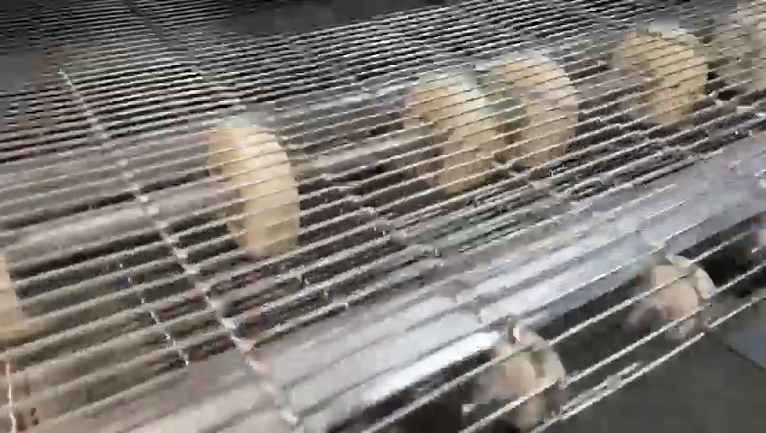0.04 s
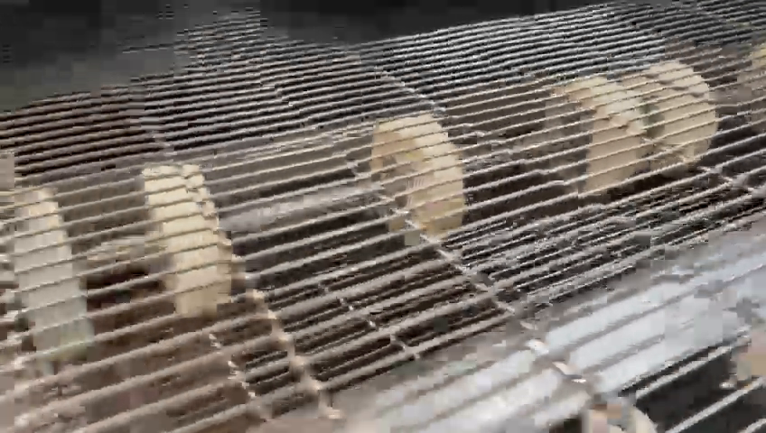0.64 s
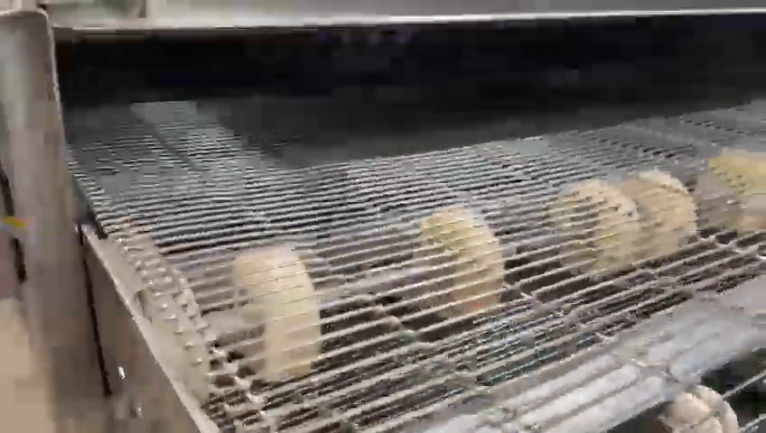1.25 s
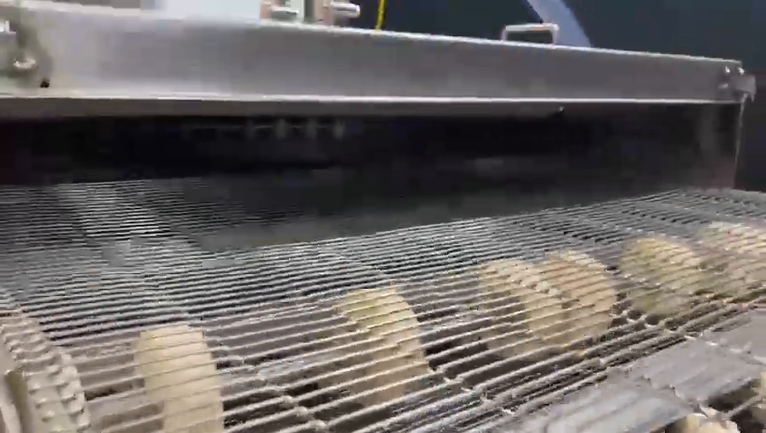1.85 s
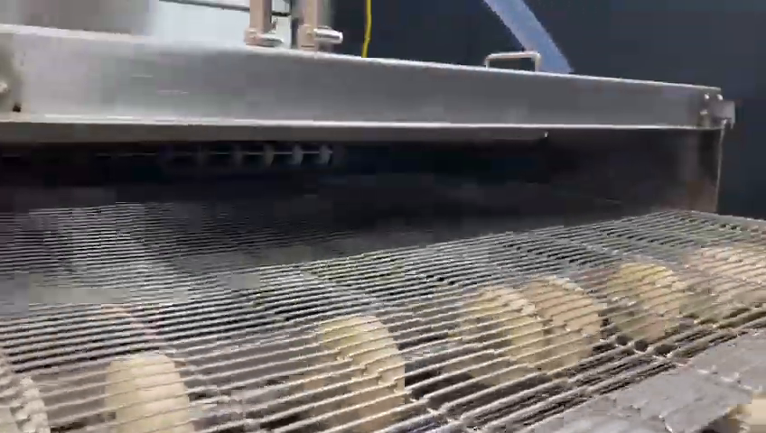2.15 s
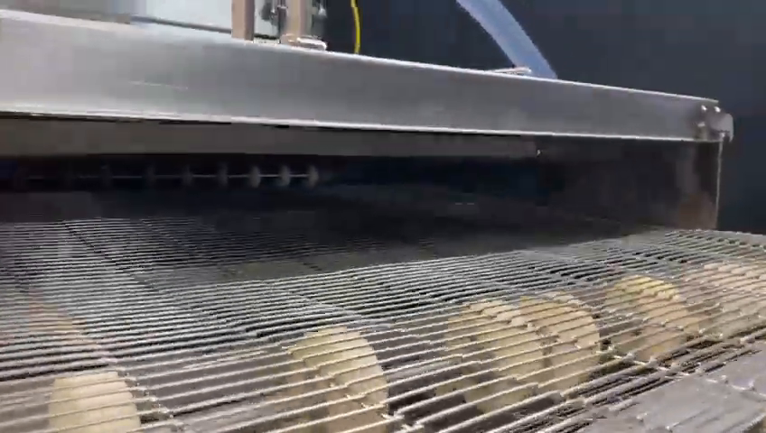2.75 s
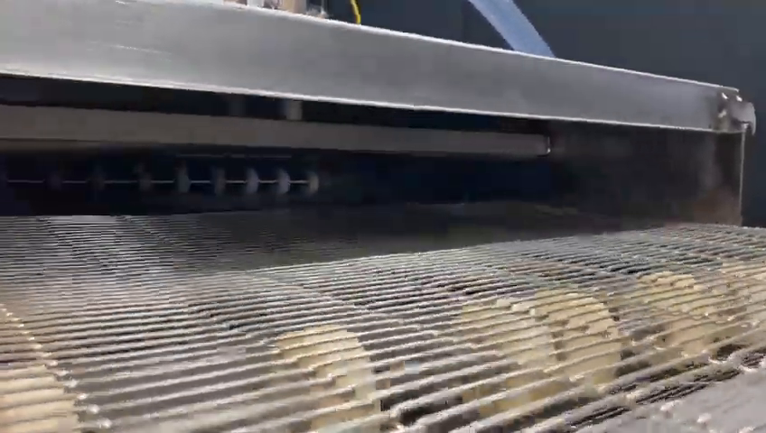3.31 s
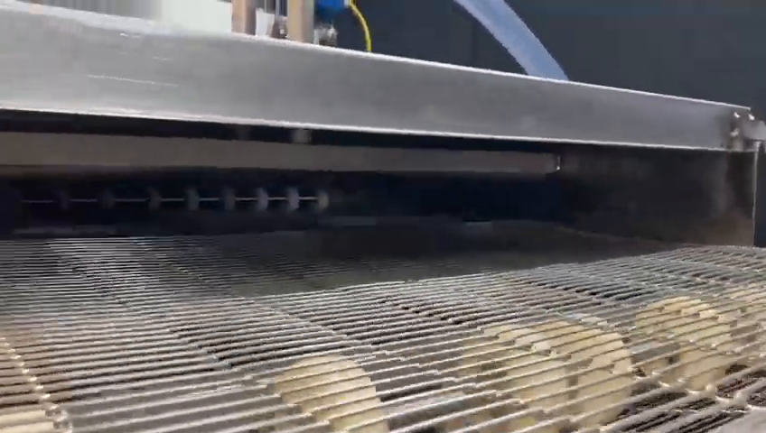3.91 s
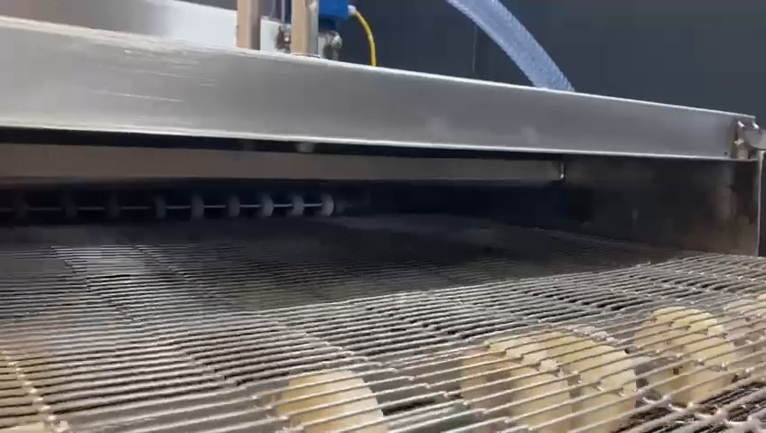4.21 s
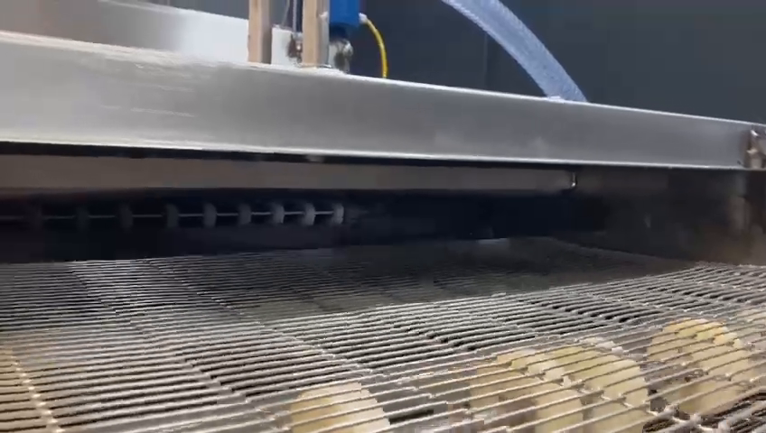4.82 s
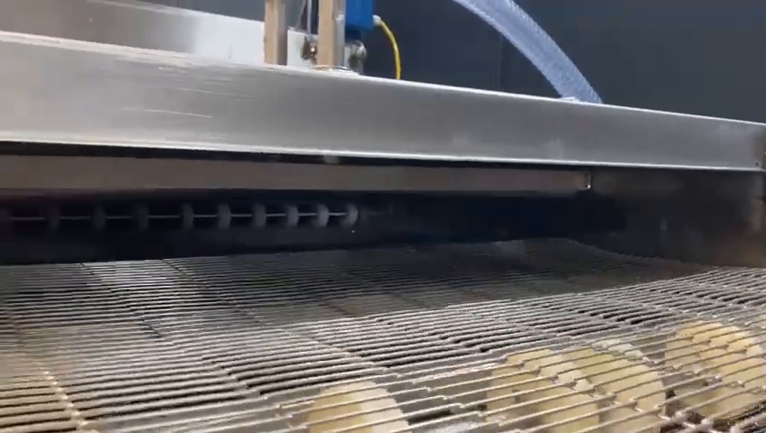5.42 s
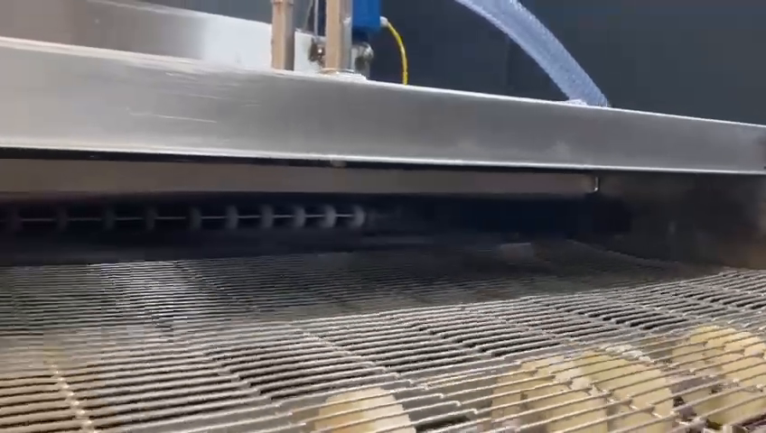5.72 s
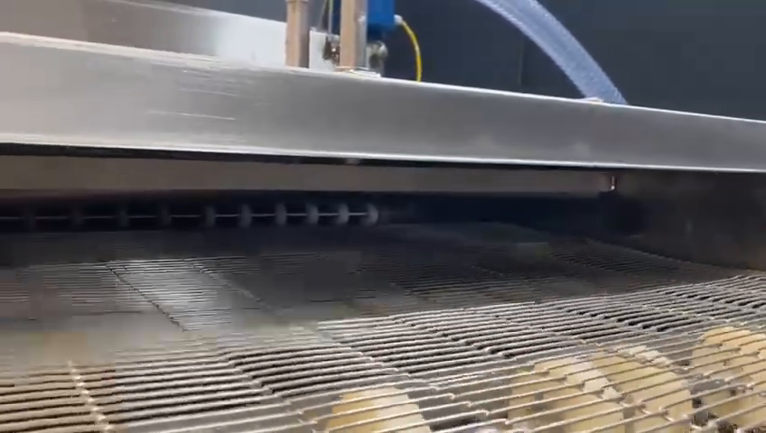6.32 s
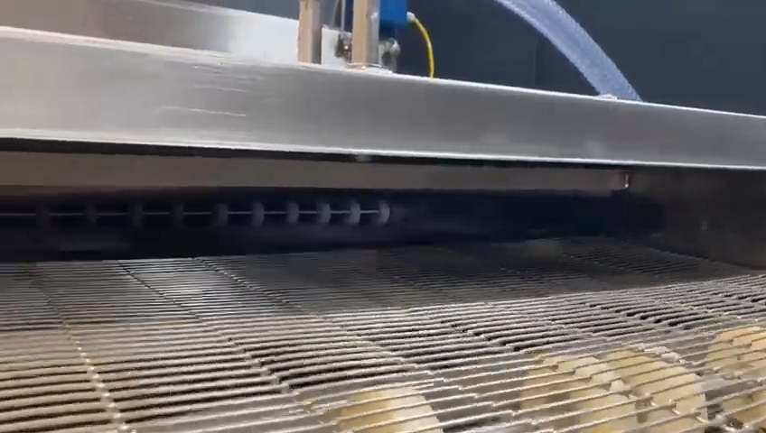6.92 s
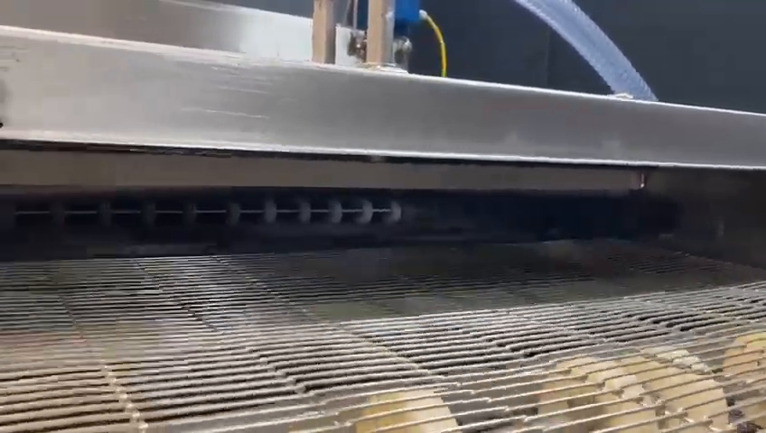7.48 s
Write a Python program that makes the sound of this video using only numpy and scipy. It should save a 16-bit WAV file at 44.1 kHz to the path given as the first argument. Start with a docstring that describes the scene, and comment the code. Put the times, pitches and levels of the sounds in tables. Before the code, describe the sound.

Close to an industrial conveyor, a steady drone of motor, steel panels and rushing air carries a thin whine and fast, slightly uneven metallic ticking from the wire belt. Soon the wires begin to chafe and squeak a little further back, with a sharp squeak midway and a drawn-out squeal just after. Late on, the ticking dips for a moment, a hard scrape cuts in, and a few high pings follow as the factory machine keeps running.

```python
"""A wire-belt conveyor runs in a factory, heard from beside its sprocket shaft. From the start, rods
tick onto the sprockets about eight times a second over a bed of motor hum, drive whine, booming steel
housing and rushing air. From about 2.3 s the belt scrapes along its guides and its wires stick and slip
into rasps, chirps and pings, with the sharpest squeak at 4.3 s and a long squeal from 4.9 s. Near 6.6 s
the ticks briefly sink away; a hard scrape follows, then a last few pings as the belt runs on."""
import sys
import numpy as np
from scipy import signal
from scipy.fft import rfft, irfft
from scipy.io import wavfile

SR = 44100
rng = np.random.default_rng(int(sys.argv[2]) if len(sys.argv) > 2 else 0)


def store_pcm(level_fs):
    """Save levels as 16-bit WAV."""
    pcm = np.round(np.clip(level_fs, -1, 1) * 32767).astype(np.int16)
    wavfile.write(sys.argv[1], SR, np.atleast_2d(pcm).T)


N = 332955
TIME = np.arange(N) / SR
FREQS = np.arange(N // 2 + 1) * SR / N
ROD_PERIOD_S, WHINE_HZ, HIGH_CUT_HZ = .1275, 790.35, 11100

# Table levels are relative; the functions set the mix.
# the belt surges and slackens, so ticks fall off the beat: time_s, lag_s, level_db
BELT_SURGE = [(0, -0.016, -17), (.63, -0.0045, -18), (0.849, 0.018, -23), (1.298, -.015, -19.5),
              (2.28, -0.032, -23.5), (2.949, -0.012, -17), (3.399, -0.024, -17), (3.849, -0.045, -21),
              (4.198, -0.039, -31), (4.5, 0.0082, -17), (4.95, -0.014, -26), (5.119, -0.037, -17.5),
              (5.65, -0.017, -23.5), (6.101, -0.026, -20), (6.601, 0.031, -47), (7.15, 0.015, -16.5),
              (7.55, 0.0088, -24)]
# tone of a struck rod's chatter: frequency_hz, level_db
CHATTER_EQ = [(2000, -20), (4000, -9), (5200, -12), (5700, 6), (6050, 0), (6500, -7), (8500, 2),
              (11500, -5.5)]
# partials of a rod's clink: pitch_hz, t60_s, level_db
CLINK_MODES = [(5550, 0.15, 1), (5690, 0.23, -0.5), (5930, 0.13, -8), (5930, 0.076, -31)]
# loud squeaks of wires on the guides: start_s, length_s, pitch_hz, fundamental_db, octave_db
LOUD_CHIRPS = [(.35, 0.055, 5040, -30, -41), (2.316, .089, 2670, -30.5, -45), (2.57, .062, 2650, -33, -59),
               (2.65, 0.096, 5450, -26.5, -32), (2.74, 0.027, 2690, -25.5, -50),
               (2.898, 0.061, 2760, -28.5, -29), (3.75, 0.1, 2676, -33, -49),
               (4.283, 0.071, 5550, -19, -29.5), (4.413, 0.058, 5260, -27.5, -31),
               (4.508, 0.047, 4990, -28, -32), (4.575, 0.057, 5470, -28.5, -34),
               (4.89, 0.78, 3690, -33, -60), (5.208, .061, 5260, -30, -28), (6.052, 0.11, 5210, -32, -40),
               (6.33, 0.15, 5350, -31.5, -36), (6.524, 0.073, 5220, -24, -39), (7.2, 0.044, 5520, -36, -35)]
# single wires ringing: start_s, length_s, pitch_hz, level_db
WIRE_PINGS = [(3.318, 0.055, 6690, -32), (3.326, 0.1, 6010, -33), (5.057, 0.13, 7830, -32.5),
              (6.934, .09, 7540, -36), (6.936, 0.064, 6000, -35), (6.95, .06, 6650, -40),
              (7.226, 0.11, 8050, -36)]
# dry wires chafing on the edge of a squeak: time_s, level_db
CHAFE_FADER = [(0, -62), (2.1, -74), (2.3, -46.5), (2.7, -40), (3.1, -46), (4.1, -44), (4.45, -36),
               (4.8, -43), (5.35, -39.5), (6.45, -39.5), (6.8, -47), (7.1, -35), (7.55, -38)]
# the belt dragging along its guide: time_s, level_db
SCRAPE_FADER = [(0, -58), (2, -65), (2.4, -42), (4.7, -43), (4.78, -34), (5.6, -36), (5.8, -41), (6.6, -51),
                (6.69, -29), (6.8, -44), (7.55, -39)]
# resonances of the guide rail: pitch_hz, width_hz, level_db
GUIDE_MODES = [(1700, 1000, -7), (2720, 280, -3.5), (3630, 490, -0.5), (4270, 710, 3), (6600, 900, -2),
               (8900, 2000, -9)]
# steady tones of motor, gearbox and drive: pitch_hz, level_db
HUM_TONES = [(49.7, -42), (99.6, -47), (116.5, -57), (216.4, -37), (316.3, -38), (349.6, -36),
             (366.2, -35.5), (399.6, -39.5), (432.8, -44), (565.9, -40), (952, -52), (1846, -48.5),
             (2911, -63), (2948, -47.5)]
# the drive's whine: time_s, level_db
WHINE_FADER = [(0.0, -27.5), (0.12, -45), (0.42, -44), (0.88, -29.5), (1.16, -34), (1.32, -28),
               (2.5, -28.5), (2.9, -27), (7.55, -27.5)]
# the housing's low boom: time_s, level_db
BOOM_FADER = [(0.0, -20.5), (0.67, -19), (0.82, -12), (1.22, -23), (1.39, -15), (1.64, -30), (1.74, -20),
              (3.53, -23), (3.57, -18.5), (4.08, -23.5), (4.29, -34.5), (4.9, -16.5), (4.98, -30),
              (5.03, -18.5), (5.32, -34), (5.42, -18.5), (5.66, -29), (5.95, -16.5), (6.29, -35.5),
              (6.35, -19.5), (6.94, -16), (7.02, -32), (7.25, -17), (7.55, -27)]
# the housing's higher drone: time_s, level_db
DRONE_FADER = [(0, -24.5), (1, -29.5), (2.3, -26), (3.2, -23), (4, -22.5), (5.3, -25), (6.5, -28),
               (7.55, -24.5)]
# weaker resonances of the housing: pitch_hz, width_hz, level_db
PANEL_MODES = [(98, 12, -42.5), (120.3, 10, -37.5), (208.4, 8.6, -27.5), (255, 28.5, -27), (281, 11, -40.5),
               (596.4, 56, -32), (823, 21, -35.5), (925, 26, -38), (1764, 220, -41), (2920, 350, -40.5),
               (5200, 1500, -65), (6520, 24, -83), (9165, 26, -47)]
# tone of the rush of air and machinery: frequency_hz, level_db
AIR_EQ = [(25, -21), (60, -13), (140, -1), (230, 1.5), (350, -3), (520, -7.5), (750, -10), (1000, -10.5),
          (1400, -15), (2000, -15), (3600, -25), (5400, -23), (6500, -35), (8500, -35), (10800, -32)]
# how alike left and right are, from 0 to 1: frequency_hz, likeness
STEREO_LIKENESS = [(30, .996), (130, .985), (400, .98), (650, .88), (1000, .55), (1400, .1), (1800, .55),
                   (2400, .27), (3300, .22), (4100, .68), (5000, .5), (6500, .88), (7500, .5), (8400, .8),
                   (11000, .8)]
# balance of the two microphone ports: frequency_hz, left_minus_right_db
STEREO_BALANCE = [(50, 0), (160, -.9), (500, -.7), (1000, .4), (1600, -1.2), (2200, 1), (3200, 1.8),
                  (4200, .9), (5400, 4.3), (6400, 0), (7700, 1.3), (9000, 0)]
# phase between the two ports: frequency_hz, left_lead_rad
STEREO_PHASE = [(500, 0), (1200, .6), (1600, -.2), (2400, .4), (3100, 1.1), (4000, .15), (5500, .6),
                (6300, 0), (7100, -.2), (7700, -2), (8700, -3.3), (9600, -6.2), (10500, -6.5),
                (11400, -9.3)]


def rod_ticks(chatter_db=-10.5, strike_s=0.036, tail_db=-2, tail_s=0.062, rattle_db=-1.5,
              bright_db=-3.0, dull_db_per_s=1.2, clink_db=-6.5, uneven_db=1.9, colour_db=-1.9):
    """Each rod snaps onto the sprocket teeth, clinks and chatters; duller as the microphone turns away."""
    body, edge, clink = np.zeros((3, N))
    starts, levels_db = rod_timing()
    chances = rng.standard_normal((len(starts), 2 + len(CLINK_MODES)))
    for start, level_db, (force, colour, *detunes) in zip(starts, levels_db, chances):
        on = (TIME >= start) & (TIME < start + .2)
        age, peak_db = TIME[on] - start, level_db + uneven_db * force
        blow = undb(peak_db) * (np.exp(-age / strike_s) + undb(tail_db) * np.exp(-age / tail_s))
        body[on] += blow
        edge[on] += blow * undb(bright_db - dull_db_per_s * start + colour_db * colour)
        for (hz, t60, mode_db), detune in zip(CLINK_MODES, detunes):
            rod_hz = hz * (1 + 0.0067 * detune)  # no two rods are tuned quite alike
            decay = undb(peak_db + mode_db - 60 * age / t60)
            clink[on] += decay * np.sin(2 * np.pi * (rod_hz * age + detune))
    grit = unit(rng.standard_normal(N) * undb(rattle_db * drift(600)))
    ring, treble = unit(undb(eq_curve(CHATTER_EQ))), eq_curve([(6500, 0.58), (8500, 1.0)])
    chatter = shape(grit * body, ring * (1 - treble)) + shape(grit * edge, ring * treble)
    return undb(chatter_db) * chatter + undb(clink_db) * clink / len(CLINK_MODES) ** .5


def rod_timing():
    """When each rod meets the sprockets, and how hard: an even beat, shifted by the belt's surge."""
    time_s, lag_s, level_db = np.transpose(BELT_SURGE)
    beat = np.arange(0, N / SR, ROD_PERIOD_S)
    return beat + np.interp(beat, time_s, lag_s), np.interp(beat, time_s, level_db)


def wire_squeaks(jitter=0.007, bend=.008, rough_db=1.5, judder_db=1.6, chirp_db=-3.5,
                 neighbour_db=-5, detune=0.033, ping_jitter=0.0065, ping_fade_s=0.16):
    """Stick and slip sets wires singing: rough chirps, each doubled by a nearby wire, and purer pings."""
    wobble = drift(330)
    grip = unit(undb(rough_db * drift(150) + judder_db * drift(28)))
    chirp_turn = 2 * np.pi * np.cumsum(1 + jitter * wobble + bend * drift(35.7)) / SR
    chirps = LOUD_CHIRPS + faint_chirps()
    wires = np.zeros(N)
    for (start, length, hz, root_db, octave_db), apart in zip(chirps, rng.standard_normal(len(chirps))):
        envelope = slip_envelope(start, length)
        on = envelope > 0
        for wire_hz, wire_db in ((hz, chirp_db), (hz * (1 + detune * apart), chirp_db + neighbour_db)):
            phase = wire_hz * chirp_turn[on]
            tone = undb(root_db) * np.sin(phase) + undb(octave_db) * np.sin(2 * phase)
            wires[on] += undb(wire_db) * envelope[on] * tone
    ping_turn = 2 * np.pi * np.cumsum(1 + ping_jitter * wobble) / SR
    for start, length, hz, db in WIRE_PINGS:
        fade = np.exp(-np.abs(TIME - start) / ping_fade_s)
        wires += undb(db) * slip_envelope(start, length) * fade * np.sin(hz * ping_turn)
    return np.sqrt(2) * grip * wires


def faint_chirps(hz=5370, scatter_hz=120, length_s=0.099, delay_s=0.041, stray_s=0.034,
                 over_db=3.0, octave_db=-4.0, uneven_db=2.5):
    """Chirp cues: each rod slips a little after it seats, louder the more the wires chafe."""
    seats, _ = rod_timing()
    when, pitch, force = rng.standard_normal((len(seats), 3)).T
    starts = seats + delay_s + stray_s * when
    chafe_db = np.interp(starts + length_s / 2, *np.transpose(CHAFE_FADER))
    levels_db = chafe_db + over_db + uneven_db * force
    return [(start, length_s, pitch_hz, db, db + octave_db)
            for start, pitch_hz, db in zip(starts, hz + scatter_hz * pitch, levels_db)]


def slip_envelope(start, length, edge_s=0.021):
    """One slip of a wire builds up, holds and dies."""
    attack = np.clip((TIME - start) / edge_s + .5, 0, 1)
    release = np.clip((start + length - TIME) / (2 * edge_s) + .5, 0, 1)
    return attack * release


def wire_chafe(hz=5400, width_hz=420, octave_db=-4, grain_db=3, judder_db=4.5):
    """Slips too irregular to make a tone excite the wires' resonance and its octave as a rasp."""
    slips = rng.standard_normal(N) * undb(grain_db * drift(600) + judder_db * drift(25))
    wire = resonance(hz, width_hz) + undb(octave_db) * resonance(2 * hz, 2 * width_hz) / np.sqrt(2)
    return fader(CHAFE_FADER) * unit(shape(slips, wire))


def guide_scrape(judder_db=1.3, grain_db=4.5):
    """Dense tiny slips of the juddering belt ring its guide rail."""
    judder = undb(judder_db * drift(49))
    slips = judder * rng.standard_normal(N) * undb(grain_db * drift(690))
    rail = sum(undb(db) * resonance(hz, width) / np.sqrt(width) for hz, width, db in GUIDE_MODES)
    return fader(SCRAPE_FADER) * unit(shape(slips, rail))


def motor(waver_db=2.97, whine_trim_db=3.0, octave_db=-39.5, swell_db=1.5):
    """Shaft and gears hum at one slightly unsteady speed; the drive whines, with a wavering octave."""
    turn = 2 * np.pi * np.cumsum(1 + 0.00039 * drift(3.0)) / SR
    hum = sum(undb(db + waver_db * drift(1.4)) * np.sin(hz * turn + rng.uniform(0, 2 * np.pi))
              for hz, db in HUM_TONES)
    whine = fader(WHINE_FADER, whine_trim_db) * np.sin(WHINE_HZ * turn)
    octave = undb(octave_db + swell_db * drift(2.7) + waver_db * drift(25)) * np.sin(2 * WHINE_HZ * turn)
    return np.sqrt(2) * (hum + pan(whine, left_db=5.5) + pan(octave, left_db=-3.5))


def housing(boom_trim_db=-0.5, drone_trim_db=-1.0):
    """Sheet steel booms and drones; weaker panels rumble underneath."""
    direct, diffuse = (throb(hz=161.6, wander_hz=3.23, rate_hz=13.1, flutter=0.39) for _ in range(2))
    boom = fader(BOOM_FADER, boom_trim_db) * widen(direct, diffuse)
    drone = fader(DRONE_FADER, drone_trim_db) * throb(hz=584.0, wander_hz=2.6, rate_hz=15.9, flutter=0.67)
    power = sum(undb(db) ** 2 * unit(np.abs(resonance(hz, width))) ** 2 for hz, width, db in PANEL_MODES)
    rumble = shape(stereo_noise(), np.sqrt(power))
    return boom + pan(drone, left_db=-3.5) + rumble


def throb(hz, wander_hz, rate_hz, flutter):
    """A sharp resonance, unevenly driven, so its pitch wanders and its level swells and dips."""
    phase = 2 * np.pi * np.cumsum(hz + wander_hz * drift(rate_hz)) / SR
    return unit(np.sin(phase) * (1 + flutter * np.tanh(drift(rate_hz))))


def air_rush(level_db=-21.5, flicker_db=1.12, rattle_db=2):
    """A broad wash of fans and machinery; in the top end the wire mesh rattles finely."""
    room = standing_waves(spacing_hz=22, depth_db=2.6)
    rush = unit(shape(stereo_noise(), room * undb(eq_curve(AIR_EQ))))
    mesh = shape(rush, eq_curve([(2500, 0), (5000, 0.44)]))
    gain = undb(level_db + flicker_db * drift(16.4))
    rattle = unit(undb(rattle_db * drift(170)))
    return gain * (rush - mesh + mesh * rattle)


def standing_waves(spacing_hz, depth_db):
    """Reflections favour some frequencies and cancel others: a still ripple, absent in the bass."""
    knots = np.arange(0, SR / 2, spacing_hz)
    ripple = np.interp(FREQS, knots, rng.standard_normal(len(knots)))
    return undb(depth_db * ripple * eq_curve([(200, 0), (900, 1.0)]))


def steel_walls(x, t60_s, wet_db):
    """Steel walls add a short dense tail, different on each side."""
    t = TIME[:SR // 2]
    tails = rng.standard_normal((2, len(t))) * undb(-60 * t / t60_s)
    wet = np.array([signal.fftconvolve(x, tail / np.linalg.norm(tail))[:N] for tail in tails])
    return x + undb(wet_db) * wet


def widen(direct, diffuse):
    """Stereo image: narrow in the bass, wider where reflections take over."""
    alike = np.sqrt(np.clip(eq_curve(STEREO_LIKENESS), 0, 1))
    mid = shape(direct, np.sqrt((1 + alike) / 2))
    side = shape(diffuse, np.sqrt((1 - alike) / 2))
    return np.array([mid + side, mid - side])


def stereo_noise():
    """White noise with the room's width."""
    return widen(*rng.standard_normal((2, N)))


def pan(x, left_db):
    """Put a sound left (positive) or right."""
    return x * undb(np.array([[left_db], [-left_db]]) / 2)


def drift(rate_hz):
    """Smooth random modulation of rms 1, changing about rate_hz times a second."""
    return unit(shape(rng.standard_normal(N), np.exp(-(FREQS / rate_hz) ** 2)))


def resonance(hz, width_hz):
    """Gain of a steep resonant peak."""
    return 1 / (1 + 1j * (FREQS - hz) / (.78 * width_hz)) ** 2


def fader(points, trim_db=0):
    """Gain at every sample, riding through (time_s, level_db) points."""
    return undb(np.interp(TIME, *np.transpose(points)) + trim_db)


def eq_curve(points):
    """(frequency_hz, value) points joined on a log-frequency axis."""
    hz, value = np.transpose(points)
    return np.interp(np.log(FREQS + 1), np.log(hz + 1), value)


def shape(x, gain):
    """Filter by a gain for each frequency."""
    return irfft(rfft(x) * gain, N)


def undb(db):
    """Decibels to gain."""
    return 10 ** (np.asarray(db) / 20)


def unit(x):
    """Scale to rms 1."""
    return x / np.sqrt(np.mean(x ** 2))


def scene():
    """Ticks up close and nearly dry, belt friction further back, all over the machine's drone."""
    near = steel_walls(rod_ticks(), t60_s=0.046, wet_db=-24.0)
    far = steel_walls(wire_squeaks() + wire_chafe() + guide_scrape(), t60_s=0.11, wet_db=-6.5)
    return near + far + motor() + housing() + air_rush()


def record(dry):
    """The two microphone ports differ in level and phase; the top end is cut steeply."""
    left_gain = undb(eq_curve(STEREO_BALANCE) / 2) * np.exp(.5j * eq_curve(STEREO_PHASE))
    ports = shape(dry, np.array([left_gain, 1 / left_gain]))
    high_cut = signal.ellip(10, .2, 80, HIGH_CUT_HZ, fs=SR, output="sos")
    return signal.sosfilt(high_cut, ports)


dry = scene()
out = record(dry)
store_pcm(out)
```